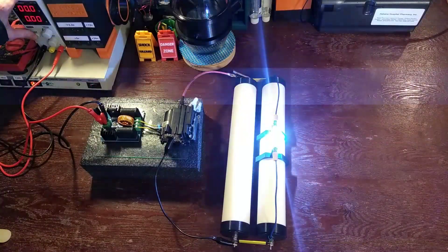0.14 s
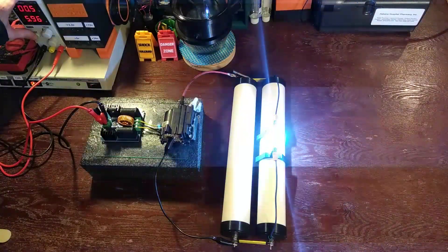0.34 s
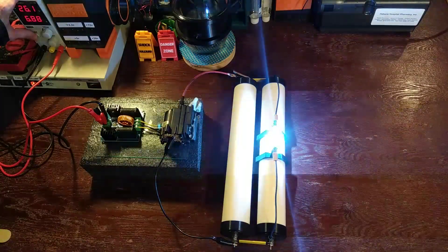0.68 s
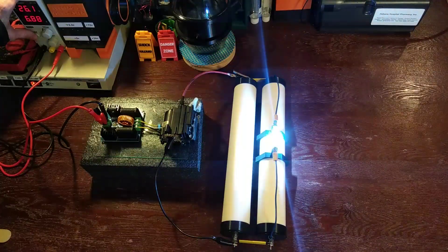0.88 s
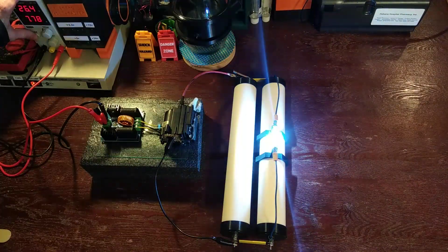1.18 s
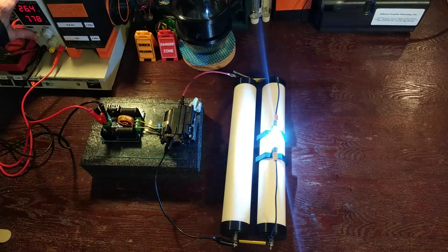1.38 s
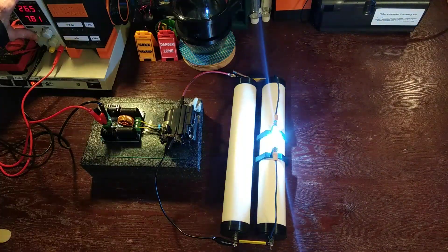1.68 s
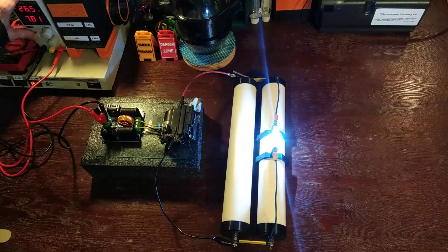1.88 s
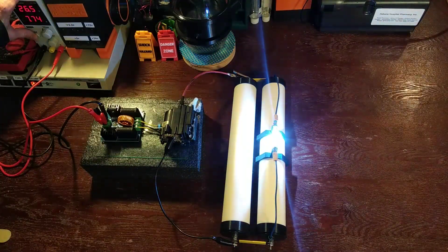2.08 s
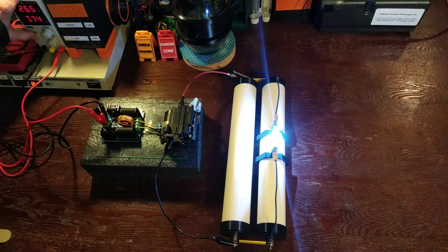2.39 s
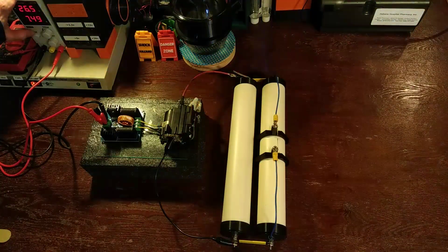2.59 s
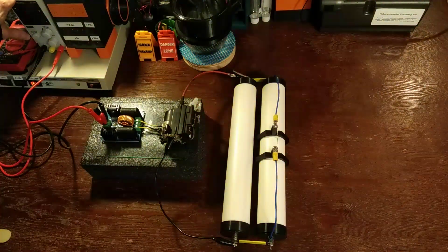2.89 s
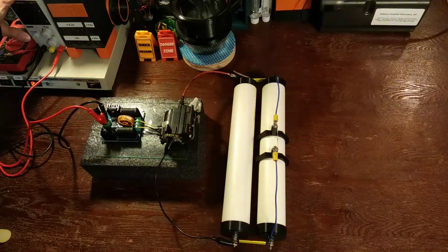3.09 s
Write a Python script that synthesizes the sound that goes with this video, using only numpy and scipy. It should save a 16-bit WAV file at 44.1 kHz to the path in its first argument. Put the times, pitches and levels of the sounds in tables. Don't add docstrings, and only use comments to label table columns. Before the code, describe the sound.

A high-voltage arc blasts on at 0.05 s, the right channel choking briefly until 0.1 s. Uneven cracks, about fifty a second, quicken after 0.55 s into a sputtering buzz, fastest and steadiest around 1.9-2.2 s, then more ragged. Bright, clipped cracks with short small-room echoes and low thumping jolts overload both microphones. It stops dead at 2.65 s, leaving a short tail, low bench ring and faint fan hum.

```python
import sys
import numpy as np
from scipy import signal
from scipy.fft import rfft, irfft
from scipy.io import wavfile
from scipy.ndimage import uniform_filter1d

SR = 44100
rng = np.random.default_rng(int(sys.argv[2]) if len(sys.argv) > 2 else 0)


def master_out(mix):
    frames = np.transpose(np.atleast_2d(mix))
    ceiling = np.clip(frames, -1, 1)
    pcm = np.round(ceiling * 32767).astype(np.int16)
    wavfile.write(sys.argv[1], SR, pcm)


def gain_from_db(level_db):
    decades = np.asarray(level_db, float) / 20
    return 10 ** decades


N = 143325


def evened(x):
    return x / np.sqrt(np.mean(x ** 2, -1, keepdims=True) + 1e-20)


def read(points, hz):
    f, value = np.transpose(points)
    return np.interp(np.log(hz + 1), np.log(f + 1), value)


def box(length_s):
    return np.clip(length_s * SR - np.arange(200), 0, 1)


def smooth_bins(x, bins):
    return uniform_filter1d(uniform_filter1d(x, size=bins, axis=1), size=3, axis=2)


# (frequency [Hz], level [dB per Hz])
HUM_COLOUR = [(25, -17.5), (110, -5), (330, -10), (600, -16.5), (1250, -23), (1450, -33.5), (1850, -31.5),
              (2300, -46)]
# (frequency [Hz], likeness [-1 opposed to 1 same])
HUM_LIKENESS = [(60, -0.94), (300, -3.1), (640, -0.37), (1400, .4), (3000, 0)]


def hum():
    level_db = -59.5 + np.array([6.5, 3])
    hz = np.fft.rfftfreq(N, 1 / SR)
    a, b = rfft(rng.standard_normal((2, N)))
    same = np.clip(read(HUM_LIKENESS, hz), -1, 1)
    right = same * a + np.sqrt(1 - same ** 2) * b
    spectrum = np.array([a, right]) * gain_from_db(read(HUM_COLOUR, hz))
    return gain_from_db(level_db)[:, None] * evened(irfft(spectrum, N))


def low_ring():
    start_s, rise_s, t60_s, pitch_hz = 2.72, 0.0417, 0.51, 96.6
    level_db = np.array([-33, -55])
    t = np.maximum(np.arange(N) / SR - start_s, 0)
    ring = (1 - np.exp(-t / rise_s)) * gain_from_db(-60 * t / t60_s) * np.sin(2 * np.pi * pitch_hz * t)
    return gain_from_db(level_db)[:, None] * ring


# (frequency [Hz], level [dB per Hz])
CRACK_COLOUR = [(200, -53), (700, -36), (2000, -18.5), (4000, -11.5), (6000, -10), (10000, -3.5),
                (13000, -6.5), (15500, -8.5)]
# (centre [Hz], width [Hz], boost [dB])
PORT_PEAKS = [(10000, 1300, -0.5), (7800, 1000, 2.5)]
# (frequency [Hz], time to fall 60 dB [s])
ROOM_DECAY = [(300, 0.12), (1100, 0.18), (3000, 0.16), (8000, 0.18), (12000, 0.16), (16000, .2)]


def room():
    direct_db, late_db, late_stretch = 17.5, -25, 1.98
    taps = rng.standard_normal((2, SR // 2))
    hz, t, z = signal.stft(taps, SR, nperseg=256)
    port_db = np.array([db * np.exp(-((hz - f) / w) ** 2) for f, w, db in PORT_PEAKS])
    colour = gain_from_db(read(CRACK_COLOUR, hz) + port_db)[..., None]
    fall_db = -60 * t / read(ROOM_DECAY, hz)[:, None]
    decay = gain_from_db(fall_db) + gain_from_db(late_db + fall_db / late_stretch)
    tail = signal.istft(z * colour * decay, SR, nperseg=256)[1]
    tail = tail * (1 + gain_from_db(direct_db) * np.exp(-np.arange(tail.shape[1]) / 5.8))
    return tail / np.linalg.norm(tail, axis=1, keepdims=True)


def swell():
    width_s, level_db = 0.0026, -7.5
    t = np.arange(N) / SR - FIRST_SPARKS[0]
    return gain_from_db(level_db) * np.exp(-(t / width_s) ** 2) * (t < .001) * [[1], [.3]]


RESTING_SHIFT = [-.014, -.038]


def slips(strain):
    per_s, length_s, level_db = [500, 370], [0.00063, 0.0013], [-18, -26.5]
    out = np.zeros((2, N))
    for c in range(2):
        train = rng.standard_normal(N) * (rng.random(N) < per_s[c] / SR)
        steps = evened(signal.oaconvolve(train, box(length_s[c]))[:N])
        out[c] = gain_from_db(level_db[c]) * steps + RESTING_SHIFT[c]
    return out * strain


def jolt(train):
    lead_s, main_s, lead_share = 0.000868, 0.001508, 0.53
    sag, sag_s = 0.15, 0.012
    port_hz, port_t60_s, port_db = 94, 0.075, -18.5
    t = np.arange(4000) / SR
    end = lead_s + main_s
    after = t > end
    shape = -sag * np.exp(-(t - end) / sag_s) * after
    shape[:200] += box(end) - (1 - lead_share) * box(lead_s)
    shape -= gain_from_db(port_db - 60 * t / port_t60_s) * np.sin(2 * np.pi * port_hz * (t - end)) * after
    return gain_from_db(-2.5) * signal.oaconvolve(train, shape)[70:N + 70]


# (time [s], level [dB])
RIGHT_SHUTS = [
    (.0515, 0.5),
    (.058, -55),
    (.076, -53),
    (.0805, 2.5),
    (.084, -3),
    (.093, -8.5),
    (.096, -27),
    (.1, 1.5),
    (.135, 2.5),
]


def microphones(air, jolts):
    drive_db, limit_db = np.array([18.5, 17]), np.array([-2.5, -6.5])
    lean_amount, lean_s = -1.1, .05
    t = np.arange(N) / SR
    drive = gain_from_db(drive_db)[:, None] * air / air[:, SR:2 * SR].std()
    level = np.sqrt(abs(uniform_filter1d(drive ** 2, 300)))
    lean_fade = np.exp(-np.maximum(t - FIRST_SPARKS[0], 0) / lean_s)
    lean = level * lean_amount * lean_fade * [[1], [0]]
    strain = np.tanh(np.maximum(level - .9, 0))
    out = gain_from_db(limit_db)[:, None] * np.tanh(drive + lean) + slips(strain)
    out[1] = out[1] * gain_from_db(np.interp(t, *np.transpose(RIGHT_SHUTS))) + jolt(jolts)
    return out


FIRST_SPARKS = [.048, .082, .104, .117, .134, .155, .173, .194, .214, .231, .25, .273, .284, .294, .307,
                .33, .348, .362, .372, .392, .405, .421, .434, .449, .485, .496, .514, .525, .538, .548]
# (time [s], rate [tries per s], share that fire [0-1], timing scatter [tries], jolt level [dB])
FIRING_RULE = [(.556, 97, 0.64, .2, -0.5), (.78, 94, 0.51, .15, -4), (.86, 121, .9, .04, -3),
               (1.2, 132, .85, .07, -4), (1.55, 146, 0.87, 0.068, -2), (1.72, 144.4, 0.73, 0.13, -2.5),
               (1.95, 174, 0.91, .06, -3.5), (2.22, 180, .9, .06, -5), (2.27, 170, 0.41, 0.36, -3),
               (2.5, 157, 0.66, .3, -6), (2.654, 158, 0.36, 0.35, -5)]


def sparks():
    spread_db, sputter_per_s, sputter_db = 1.5, 320, -9.5
    t0, rate, share, scatter, jolt_db = np.transpose(FIRING_RULE)
    t = np.arange(t0[0], t0[-1], 1 / SR)
    waver = 1 + .045 * evened(uniform_filter1d(rng.standard_normal(N), 900))[:len(t)]
    tries_so_far = np.cumsum(np.interp(t, t0, rate) * waver) / SR
    tries = t[np.flatnonzero(np.diff(np.floor(tries_so_far)))]
    draw = rng.standard_normal((600, 4))[:len(tries)].T
    tries = tries + draw[0] * np.interp(tries, t0, scatter / rate)
    chance = 1 / (1 + np.exp(-1.7 * draw[1]))
    fired = chance < np.interp(tries, t0, share)
    at = np.round(np.r_[FIRST_SPARKS, tries[fired], t0[-1]] * SR).astype(int)
    size = gain_from_db(spread_db * np.r_[np.zeros(len(FIRST_SPARKS)), draw[2][fired], 0])
    cracks, jolts = np.zeros((2, N))
    cracks[at] = size
    jolts[at] = np.minimum(size, 1.15) * gain_from_db(np.interp(at / SR, t0, jolt_db))
    sample = np.arange(N)
    live = (sample > FIRST_SPARKS[2] * SR) & (sample < t0[-1] * SR)
    sputter_on = (rng.random(N) < sputter_per_s / SR) * live
    sputter = gain_from_db(sputter_db) * rng.standard_normal(N) * sputter_on
    return cracks + sputter, jolts


def scene():
    cracks, jolts = sparks()
    air = signal.fftconvolve(cracks[None], room(), axes=1)[:, :N]
    return microphones(air, jolts) + swell() + low_ring() + hum()


# (frequency [Hz], level [dB])
DROPOUT = [(1500, -14), (2600, -3.5), (3500, .5), (6800, 1), (8000, -3), (11500, -4), (13000, .5),
           (15500, .5)]


def thin_out(x):
    patch_db, from_s, makeup = 2.5, .12, .8
    turn = np.array([[1, 1], [1, -0.95]]) / np.sqrt(2)
    hz, t, z = signal.stft(turn @ x, SR, "cosine", nperseg=2048)
    power = abs(z) ** 2
    near = smooth_bins(power, 48)
    patch = smooth_bins(rng.standard_normal(z.shape), 10)
    limit_db = read(DROPOUT, hz)[:, None] + patch_db * patch / patch.std()
    keep = (power > near * gain_from_db(2 * limit_db)) | (t < from_s)
    left = smooth_bins(power * keep, 48)
    lift = ((near + 1e-20) / (left + 0.088 * near + 1e-20)) ** (makeup / 2)
    return turn @ signal.istft(z * keep * lift, SR, "cosine", nperseg=2048)[1][:, :N]


def roll_off(x):
    return signal.sosfilt(signal.butter(12, 15670, fs=SR, output="sos"), x)


def record(dry):
    edge = signal.firwin(255, 15800, window=("kaiser", 9), fs=SR)
    above = signal.sosfilt(signal.butter(1, 47, "high", fs=SR, output="sos"), dry)
    offset = signal.sosfilt(signal.butter(1, 8, "low", fs=SR, output="sos"), dry)
    limited = signal.oaconvolve(above + offset, edge[None], "same")
    mix = thin_out(np.clip(limited, -1.15, 1.15))
    return roll_off(mix)


dry = scene()
out = record(dry)
master_out(out)
```